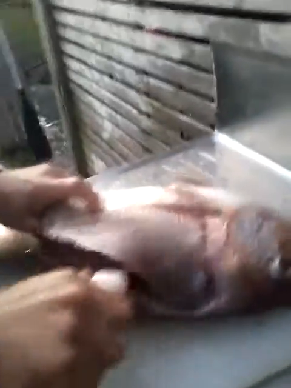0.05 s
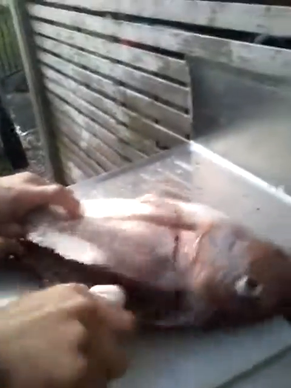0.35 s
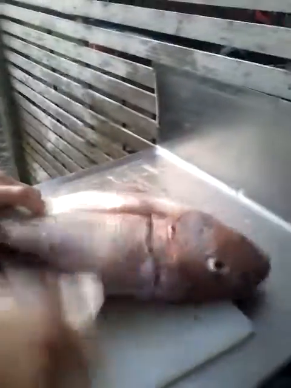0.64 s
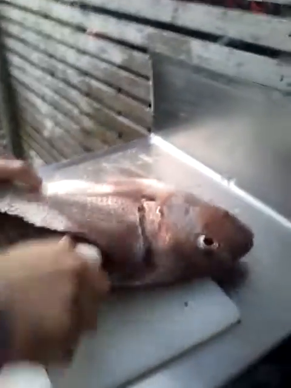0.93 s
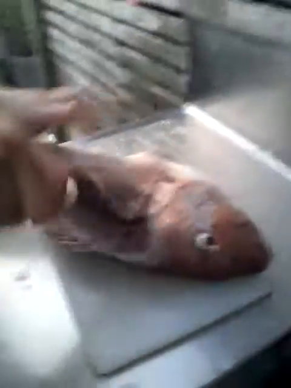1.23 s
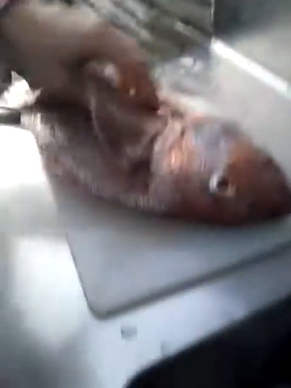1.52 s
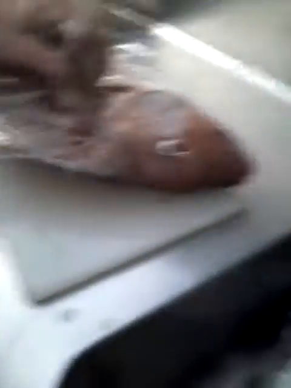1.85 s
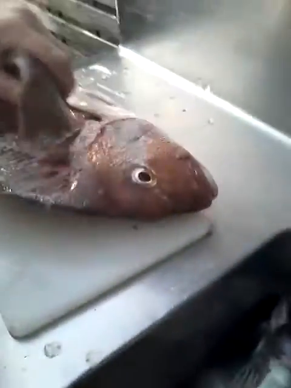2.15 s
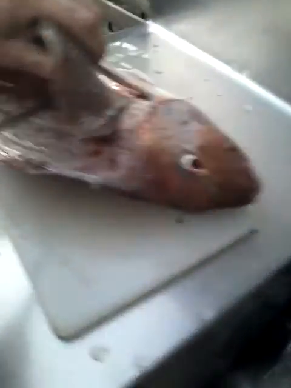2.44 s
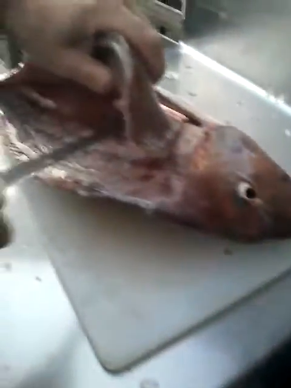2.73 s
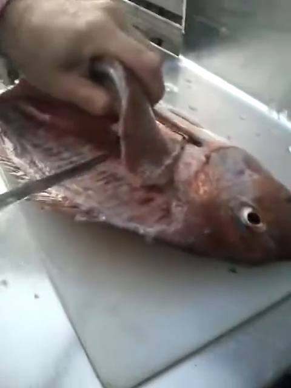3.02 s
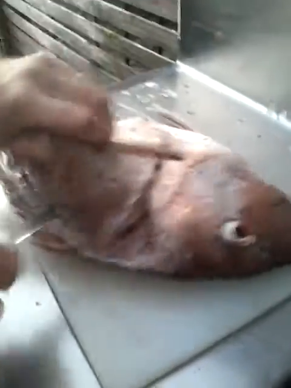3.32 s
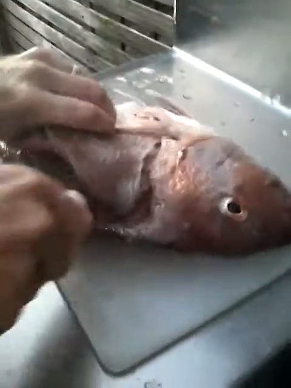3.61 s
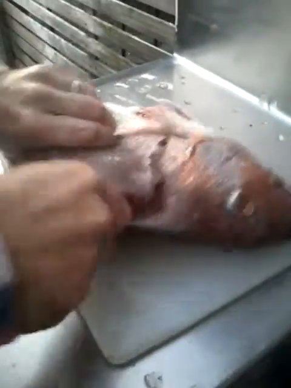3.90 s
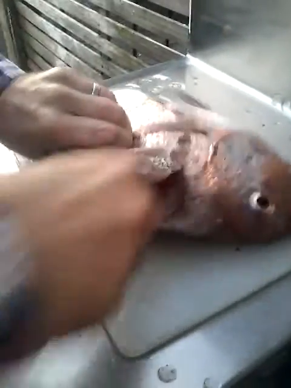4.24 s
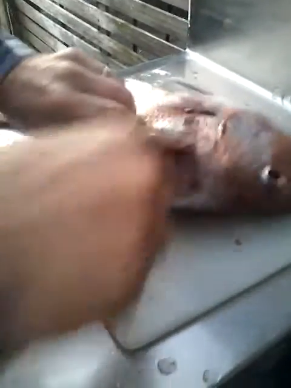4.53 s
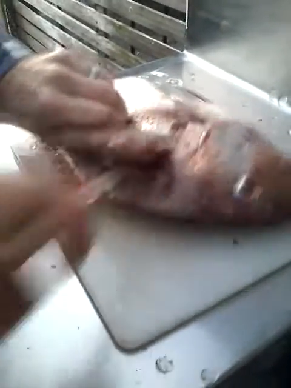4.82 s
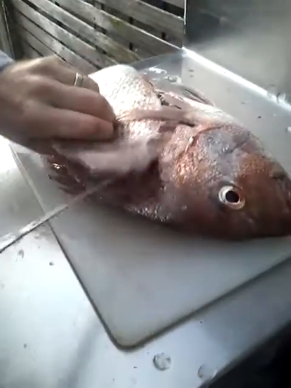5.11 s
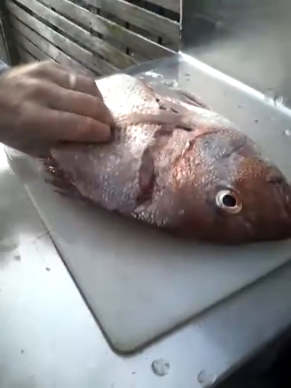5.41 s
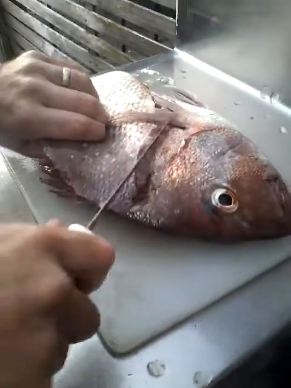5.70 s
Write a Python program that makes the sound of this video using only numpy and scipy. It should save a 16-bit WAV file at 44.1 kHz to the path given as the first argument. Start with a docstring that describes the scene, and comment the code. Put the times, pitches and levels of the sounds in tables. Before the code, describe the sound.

Close to the microphone, a blade scrapes along a fish's backbone in short strokes, crackling through little bones and wet flesh while the cutting board bumps dully. One sharp snap stands out late on, followed by a last few cuts and clicks. Nearby in the open air, a bird gives the same quiet descending whistle about twice a second, carrying on over a light hiss after the knife stops.

```python
"""On a steel outdoor bench, a knife frees a fish fillet on a plastic board.
Friction along the backbone excites the resonances of blade and bone as a rasp, and small bones
and scales fracture in sharp snaps. Wet flesh squelches and pops; the board's damped modes answer
bumps with dull knocks. Over a faint hiss, a nearby bird repeats one nearly pure whistle,
which falls about an octave and ends on a held note."""
import sys
import numpy as np
from scipy import signal
from scipy.fft import rfft, irfft, next_fast_len
from scipy.io import wavfile
from scipy.ndimage import uniform_filter1d

SR = 44100
rng = np.random.default_rng(int(sys.argv[2]) if len(sys.argv) > 2 else 0)


def inscribe(sig):
    """Save sig as 16-bit PCM at rate SR to the path in sys.argv[1].

    A 1-D sig is mono; a 2-D sig holds one channel per row.
    Samples are clipped to [-1, 1] before scaling.
    """
    pcm = np.round(np.clip(np.atleast_2d(sig).T, -1, 1) * 32767)
    wavfile.write(sys.argv[1], SR, pcm.astype(np.int16))


N = 258057

# spectra of the steady hiss and of its swells: frequency_hz, gain_db
AIR_SPECTRUM = [(20, -3), (40, -6), (60, -0.5), (241, -2), (372, -6), (417, 1), (536, -8), (587, -4),
                (1720, -9.5), (11700, -10.5), (14000, -5)]
SWELL_SPECTRUM = [(60, -7.5), (200, -1.5), (600, -1.5), (1200, -2), (3000, -8), (6300, -0.5), (9000, -7.5),
                  (14000, -14.5)]
# strokes of the knife: start_s, length_s, rasp_db, flesh_db, rub_db
STROKES = [(0.01, 0.2, -54.5, -58.5, -58.5), (0.155, 0.057, -45.5, -52, -57),
           (0.248, 0.13, -58, -62.5, -58.5), (0.394, 0.089, -57.5, -64.5, -63.5),
           (0.462, 0.22, -55, -57.5, -59), (0.679, 0.095, -51, -54, -59.5),
           (0.776, 0.035, -57.5, -56.5, -59), (0.949, 0.17, -53, -58.5, -59.5),
           (1.145, 0.155, -59, -65.5, -65.5), (1.218, 0.2, -55, -60, -60.5), (1.42, 0.09, -65.5, -67, -75),
           (1.506, 0.16, -59, -68.5, -70), (1.677, 0.095, -56, -66, -71), (1.892, 0.036, -61.5, -62, -65.5),
           (2.044, 0.49, -64, -73, -71.5), (2.511, 0.13, -57, -69.5, -67), (2.605, 0.18, -53.5, -65, -65),
           (2.743, 0.099, -57, -65.5, -65.5), (2.849, 0.14, -55.5, -63.5, -66.5),
           (2.92, 0.082, -52, -62.5, -70), (3.024, 0.19, -58.5, -67, -70),
           (3.204, 0.033, -52.5, -55.5, -61), (3.266, 0.089, -54, -62, -64),
           (3.358, 0.041, -50, -49.5, -59.5), (3.424, 0.19, -54, -62, -65),
           (3.557, 0.19, -54, -60.5, -62.5), (3.73, 0.26, -54.5, -61.5, -61.5),
           (3.875, 0.22, -52, -55, -57.5), (4.101, 0.11, -49.5, -48, -51.5),
           (4.227, 0.065, -48.5, -53.5, -49.5), (4.285, 0.2, -54, -58.5, -61.5),
           (4.402, 0.17, -48.5, -55, -58), (4.567, 0.11, -50.5, -52.5, -54),
           (4.648, 0.19, -54.5, -62, -60.5), (4.845, 0.09, -44.5, -57, -54.5),
           (5.178, 0.15, -75.5, -73, -78)]
# resonances of blade and bone: frequency_hz, width_hz, gain_db
BLADE_MODES = [(2510, 400, -21.5), (4707, 450, 0.5), (5000, 840, -2.5), (5983, 1300, 13.5), (6960, 860, 3),
               (8360, 500, -7.5), (9480, 390, -13), (10440, 700, -13), (12500, 900, -23.5)]
# spectra of the rasping edge, tearing flesh and rubbing on the board: frequency_hz, gain_db
RASP_SPECTRUM = [(1530, -37), (2600, -13), (3390, -7.5), (4040, -3), (5530, -5.5), (6130, -7), (6950, -2),
                 (8100, -2.5), (9040, -5), (13800, -9), (14600, -34.5), (15000, -41.5)]
FLESH_SPECTRUM = [(410, -26.5), (700, -4.5), (1080, -1), (1330, -1.5), (1810, -2), (2700, -3.5),
                  (4000, -4.5), (5200, -32.5), (8800, -120)]
RUB_SPECTRUM = [(22, -17), (40, -17.5), (76, -14), (115, -10.5), (165, -1.5), (270, -5), (335, -6.5),
                (483, -3), (695, -6), (792, -9), (865, -8), (1040, -6), (1120, -10), (1190, -5.5),
                (1300, -22.5), (1690, -43), (2860, -120)]
# larger bones and scales breaking: start_s, level_db, pitch_hz, relative_crunch_db, relative_crack_db
FRACTURES = [(0.0436, -22, 6640, -11, -8.5), (0.0526, -19, 7700, -8.5, -25),
             (0.0775, -15.5, 6400, -18, -32), (0.1045, -23, 4640, -13, -20),
             (0.1093, -20, 5700, -12, -13.5), (0.179, -27, 6400, -21, -12), (0.316, -21.5, 6200, -12, -19),
             (0.331, -19.5, 6520, -5, -16.5), (0.5595, -25.5, 5940, -12.5, -40),
             (0.62, -22.5, 6600, -45, -15), (0.689, -16, 6240, -11, -8), (0.7011, -28, 6450, -6, -9),
             (0.7075, -25.5, 5560, -3, -34), (0.744, -28, 6750, -8.5, -28), (0.7545, -31.5, 6300, -10, -33),
             (0.768, -29, 6450, -13, -25), (0.783, -29, 6400, -15, -27), (0.893, -39, 4320, -16, -32),
             (0.921, -43, 6370, -22, -22), (0.984, -27.5, 4030, -10, -10), (1.362, -38, 6500, -10, -24),
             (1.718, -31, 6000, -21, -17), (1.922, -45, 4400, -0.5, -26), (1.971, -38.5, 6580, -34, -26),
             (2.265, -33.5, 6840, -26, -38), (2.4034, -32, 6100, -10.5, -13), (2.543, -35, 6050, -12, -30),
             (2.594, -38.5, 6050, -4.5, -32), (2.614, -33, 5870, -15, -23), (2.627, -38, 6500, -19, -23),
             (2.645, -30, 5750, -22, -30), (2.65, -32.5, 6340, -24, -25), (2.676, -30.5, 5840, -19, -34),
             (2.704, -35, 5200, -11, -25), (2.7222, -35.5, 6700, -14, -30), (2.734, -41, 7400, -27, -4),
             (2.7611, -36, 5900, -11, -34), (2.9837, -34, 6100, -10, -30), (2.9916, -27.5, 6600, -16, -29),
             (3.1721, -33.5, 6360, -15, -38), (3.337, -45, 6500, -17, -10), (3.446, -36, 6360, -14, -12),
             (3.5242, -25, 6300, -41, -18), (3.5818, -24.5, 4930, -14, -39), (3.6167, -27, 6300, -19, -40),
             (3.6675, -33, 6100, -22, -32), (3.708, -29.5, 6300, -28, -14), (3.797, -40.5, 4700, -4, -32),
             (3.857, -36, 6700, -15, -25), (3.903, -35, 5800, -22, -22), (3.908, -28, 5400, -13, -34),
             (3.984, -29.5, 6600, -11.5, -31), (4.0196, -29.5, 4580, -26, -29.5),
             (4.0396, -27, 7320, -27.5, -6.5), (4.0444, -14.5, 7190, -40, -15),
             (4.045, -17.5, 4950, -39, -23), (4.1136, -0.5, 7280, -49, -8),
             (4.1133, -24.5, 4686, -14.5, -25), (4.181, -24.5, 5270, -16, -8), (4.189, -15, 5850, -34, -14),
             (4.2459, -25, 7700, -16, -1.5), (4.273, -30.5, 7300, -29, -4.5),
             (4.2907, -27.5, 5670, -24, -25), (4.411, -34.5, 5060, -27, -17),
             (4.447, -26.5, 4730, -18, -35), (4.47, -25.5, 4600, -13, -38), (4.554, -44, 7000, -30, 0),
             (4.6553, -25.5, 8740, -11, -10), (4.676, -33, 5200, -16, -28), (4.717, -33.5, 6800, -16, -11),
             (4.7338, -34, 7040, -18, -11), (4.762, -44, 7200, -38, -2), (4.8773, -17.5, 4300, -16, -14.5),
             (4.8815, -22.5, 7100, -13, -22), (4.92, -32.5, 5470, -3, -30), (4.938, -26, 7800, -26, -21),
             (5.329, -50, 6110, -17, -7), (5.7234, -37, 6030, -17.5, -22)]
# fish and knife hand bumping the board: start_s, level_db, pitch_hz, relative_thud_db
KNOCKS = [(0.051, -46.5, 437, -32), (0.108, -48, 450, -28), (0.33, -39, 467, -43), (0.6885, -45, 471, -30),
          (0.705, -41.5, 370, -14), (0.716, -37, 334, -23), (0.755, -46, 230, -21), (0.894, -58, 380, -14),
          (0.98, -51, 220, -18), (1.896, -53, 910, -25), (1.916, -56, 630, -29), (3.523, -49, 600, -22),
          (4.026, -46, 230, -12), (4.113, -27.5, 600, -26), (4.115, -32.5, 561, -24.5),
          (4.122, -41.5, 176, -12.5), (4.268, -41.5, 555, -9), (4.278, -44.5, 165, 0),
          (4.646, -45, 166, -27), (4.869, -37.5, 1015, -30), (4.871, -37.5, 690, -29),
          (4.878, -39, 215, -27), (4.904, -54, 757, -14)]
# resonances of the board under the fish: frequency_hz, width_hz, gain_db
BOARD_MODES = [(176, 290, -5), (234, 70, -3.5), (361, 87, -2), (440, 44, 2.5), (592, 45, -2.5),
               (740, 200, -12)]
# the bird's calls: start_s, top_pitch_hz, fall_s, fall_db, held_db, held_s
WHISTLES = [(0.49, 2350, 0.034, -60, -59, 0.081), (1.009, 2280, 0.033, -58.5, -57.5, 0.072),
            (1.616, 2250, 0.036, -59, -65, 0.067), (2.233, 2430, 0.032, -57, -61, 0.064),
            (2.781, 2520, 0.031, -54.5, -58, 0.073), (3.347, 2520, 0.027, -53, -59.5, 0.073),
            (3.913, 2350, 0.028, -56.5, -57.5, 0.078), (4.525, 2480, 0.034, -54.5, -56.5, 0.083),
            (5.173, 2400, 0.035, -64.5, -65.5, 0.053), (5.766, 2450, 0.033, -64, -65, 0.055)]
# contour of the hollow hum: time_s, level_db
HUM_CONTOUR = [(1.15, -91), (1.27, -67), (1.42, -63), (1.53, -76.5), (1.7, -76), (1.83, -97), (1.95, -77.5),
               (2.4, -77), (2.7, -82)]
# pockets of wet flesh popping open: start_s, level_db, pitch_hz
WET_POPS = [(1.2735, -40.5, 5800), (1.2945, -45, 5660), (1.2975, -35.5, 8850), (1.2995, -34, 5710),
            (1.3012, -31.5, 5640), (2.5247, -44, 6160), (3.168, -41, 6360), (3.667, -33, 6110),
            (4.9255, -35, 7060), (4.946, -37, 7900)]

LIFTED_S = 5.0  # the blade stops resting in the fish


def from_db(db):
    """Amplitude ratio of a level in decibels."""
    return 10 ** (np.asarray(db) / 20)


def rms_one(x):
    """Normalisation to unit rms."""
    return x / np.sqrt(np.mean(x ** 2) + 1e-20)


def crest_one(x, size):
    """Normalisation to unit rms over the loudest run of `size` samples."""
    return x / np.sqrt(uniform_filter1d(x ** 2, size).max())


def add(out, start_s, sound):
    """Superposition of a sound from a given time on."""
    start = max(0, round(start_s * SR))
    out[start:start + len(sound)] += sound[:N - start]


def band(x, low_hz, high_hz, order=2):
    """Causal band-pass filtering."""
    sections = signal.butter(order, [low_hz, min(high_hz, .45 * SR)], "band", fs=SR, output="sos")
    return signal.sosfilt(sections, x)


def resonance(x, hz, width_hz):
    """Forced response of a damped two-pole oscillator, with unit peak gain."""
    r = np.exp(-np.pi * width_hz / SR)
    feedback = [1, -2 * r * np.cos(2 * np.pi * hz / SR), r * r]
    return signal.lfilter(np.array([1, 0, -1]) * (1 - r * r) / 2, feedback, x)


def wandering_resonance(x, hz, width_hz):
    """Forced response of an oscillator whose natural frequency varies sample by sample."""
    r = np.exp(-np.pi * width_hz / SR)
    turn = np.exp(2j * np.pi * np.cumsum(hz) / SR)
    return 2 * np.real(turn * signal.lfilter([1 - r], [1, -r], x / turn))


def coloured(x, spectrum):
    """Spectral shaping by a gain curve, normalised to unit rms."""
    hz, db = np.transpose(spectrum)
    size = next_fast_len(N + SR // 10)
    bin_hz = np.maximum(np.arange(size // 2 + 1) * SR / size, 1)
    gain = from_db(np.interp(np.log(bin_hz), np.log(hz), db, left=-90, right=-90))
    return rms_one(irfft(rfft(x, size) * gain, size)[:N])


def drift(per_s):
    """Random modulation of unit rms, interpolated between independent values."""
    knots = rng.standard_normal(int(per_s * N / SR) + 2)
    return rms_one(np.interp(np.arange(N) * per_s / SR, np.arange(len(knots)), knots))


def envelope(t, attack_s, length_s, release_s):
    """Linear rise from t = 0, then exponential decay after length_s."""
    return np.clip(t / attack_s, 0, 1) * np.exp(-np.clip((t - length_s) / release_s, 0, 20))


def friction(per_s, spread_db, grain_s, smooth_db):
    """Shot noise: tiny tears of uneven size, each a decaying puff, over smooth sliding."""
    sizes = from_db(spread_db * np.minimum(rng.exponential(1, N), 3.5))
    tears = (rng.random(N) < per_s / SR) * sizes ** 2
    power = signal.lfilter([1], [1, -np.exp(-1 / (grain_s * SR))], tears + 1e-18)
    return rng.standard_normal(N) * np.sqrt(power / power.mean() + from_db(smooth_db) ** 2)


def burst(t60_s, rise_s):
    """A transient force of random sign and exponential decay, as of fibres failing in a fast run."""
    t = np.arange(SR // 14) / SR
    return rng.choice([-1, 1], len(t)) * from_db(-60 * t / t60_s) * (1 - np.exp(-t / rise_s))


def hiss(steady_db=-74.5, swell_db=-69, lead_s=0.022):
    """Broadband noise: a faint steady floor, and an amplitude swell around each whistle."""
    t = np.arange(N) / SR
    swell = sum(envelope(t - start_s + lead_s, attack_s=0.014, length_s=0.064, release_s=0.056)
                for start_s, *_ in WHISTLES)
    steady = from_db(steady_db) * coloured(rng.standard_normal(N), AIR_SPECTRUM)
    return steady + from_db(swell_db) * swell * coloured(rng.standard_normal(N), SWELL_SPECTRUM)


def stroke_levels(resting_db=(-69, -73.5, -73), attack_s=0.03, release_s=0.03):
    """Amplitude envelopes, in dB, of rasp, flesh and rubbing: each stroke bites, holds and lets go."""
    t = np.arange(N) / SR
    in_fish = 1 - np.clip((t - LIFTED_S) / release_s, 0, 1)
    level = np.outer(from_db(resting_db), in_fish)
    for start_s, length_s, *levels_db in STROKES:
        push = envelope(t - start_s, attack_s, length_s, release_s)
        level = np.maximum(level, np.outer(from_db(levels_db), push))
    return 20 * np.log10(level + 1e-9)


def blade_rasp():
    """Friction over the ribs drives the blade's modes, which shift and swell as it moves in the flesh."""
    teeth = friction(per_s=63, spread_db=4.5, grain_s=0.0024, smooth_db=4.0)
    ringing = np.zeros(N)
    for hz, width_hz, db in BLADE_MODES:
        gain = from_db(db + 4.0 + 4.0 * drift(7))
        ringing += gain * wandering_resonance(teeth, hz * (1 + .03 * drift(5)), .6 * width_hz)
    rasp = coloured(teeth + ringing, RASP_SPECTRUM)
    return rasp / np.sqrt(uniform_filter1d(rasp ** 2, size=SR // 16))  # evens out the loudness


def flesh_tearing():
    """Dense, uneven ruptures of wet tissue sum to a squelching noise."""
    return coloured(friction(per_s=160, spread_db=9.0, grain_s=0.0014, smooth_db=5.0), FLESH_SPECTRUM)


def board_rubbing():
    """Sliding friction of fish on board, given a hollow note by a resonance of the bench."""
    sliding = friction(per_s=120, spread_db=1.5, grain_s=0.0011, smooth_db=6.0)
    hollow = from_db(-4) * resonance(sliding, hz=480, width_hz=80)
    return coloured(sliding + hollow, RUB_SPECTRUM)


def cutting(rasp_db, flesh_db, rub_db):
    """Common amplitude modulation: edge, flesh and sliding fish all catch together."""
    catching = drift(70)
    rasp = blade_rasp() * from_db(rasp_db - 1.24 + 1.86 * catching)
    flesh = flesh_tearing() * from_db(flesh_db - 1.0 + 0.86 * catching)
    rub = board_rubbing() * from_db(rub_db - 3.0 + 1.5 * catching)
    return rasp + flesh + rub


def crackles(rasp_db, per_s=80, above_db=10.5, spread_db=5.5, centre_hz=6145, spread_octaves=0.3):
    """A random point process of tiny pops under the blade, in proportion to the stroke's strength."""
    rows = []
    for when, size, pitch in rng.random((int(per_s * LIFTED_S), 3)):
        start_s = when * LIFTED_S
        level_db = rasp_db[int(start_s * SR)] + above_db + spread_db * (2 * size - 1)
        octaves = np.clip(spread_octaves * np.arctanh(2 * pitch - 1), -2, 1)
        rows.append((start_s, level_db, centre_hz * 2 ** octaves))
    return pops(rows, cycles=9, rise_s=0.00003)


def first_gives(lead_s=0.0046):
    """Yield before fracture: tough tissue gives weakly ahead of each snap; rows as in FRACTURES."""
    return [(start_s - lead_s, level_db + crunch_db - 1.5, hz, crunch_db, crack_db)
            for start_s, level_db, hz, crunch_db, crack_db in FRACTURES]


def snaps(fractures, favour_db=11.5, favour_octaves=0.085):
    """Fracture excites the blade's modes, most near its own pitch, with a crack above and crunch below."""
    out = np.zeros(N)
    for start_s, level_db, hz, crunch_db, crack_db in fractures:
        t60_s = 0.031 * 2 ** (crunch_db / 32)  # a break through flesh outlasts a clean one
        force = burst(t60_s, rise_s=0.0001)
        force[0] = 5  # the first fibre parts with a clean click
        ring = from_db(19.0) * rms_one(resonance(force, hz, width_hz=370))
        for mode_hz, width_hz, db in BLADE_MODES:
            nearness = np.exp(-(np.log2(mode_hz / hz) / favour_octaves) ** 2)
            ring += from_db(db + favour_db * nearness) * rms_one(resonance(force, mode_hz, width_hz))
        ring = crest_one(band(ring, 1200, 10000), size=66)
        crack = crest_one(band(burst(0.79 * t60_s, rise_s=0.00012), 5500, 11800, order=3), size=66)
        crunch = crest_one(band(burst(1.04 * t60_s, rise_s=0.00036), 840, 3200), size=66)
        snap = from_db(-9.5) * ring + from_db(crack_db - 7.5) * crack + from_db(crunch_db - 10) * crunch
        add(out, start_s, from_db(level_db) * snap)
    return out


def knocks(scuff_db=-9, spot_db=3):
    """A soft impact excites the struck spot and the board's damped modes; the bench thuds below."""
    out = np.zeros(N)
    for start_s, level_db, hz, thud_db in KNOCKS:
        scuff = burst(t60_s=0.053, rise_s=0.001)
        force = signal.unit_impulse(len(scuff)) + from_db(scuff_db) * scuff / np.linalg.norm(scuff)
        push = resonance(force, hz, width_hz=400)
        spot = from_db(spot_db) * resonance(push, hz, width_hz=120)
        modes = sum(from_db(db) * resonance(push, mode_hz, width) for mode_hz, width, db in BOARD_MODES)
        ring = crest_one(spot + modes, size=180)
        thud = crest_one(band(burst(t60_s=0.024, rise_s=0.00051), 87.6, 220), size=440)
        add(out, start_s, from_db(level_db - 1.5) * ring + from_db(level_db + thud_db - 6) * thud)
    return out


def bird(last_hz=1127, sag_hz_per_s=130, waver=0.0091, overtone_db=-26):
    """Frequency modulation of a nearly pure tone: a fluttering glide down to an almost level note."""
    out = np.zeros(N)
    t = np.arange(SR // 3) / SR
    held_hz = last_hz - sag_hz_per_s * t
    fall = envelope(t, attack_s=0.0085, length_s=0.03, release_s=0.017)
    for start_s, top_hz, fall_s, fall_db, held_db, held_s in WHISTLES:
        glide_hz = held_hz + (top_hz - held_hz) * np.exp(-(t / fall_s) ** 1.95)
        pitch_hz = glide_hz * (1 + waver * drift(300)[:len(t)])
        phase = 2 * np.pi * np.cumsum(pitch_hz) / SR
        tone = np.sin(phase) + from_db(overtone_db) * np.sin(2 * phase)
        held = envelope(t - 0.051, attack_s=0.0079, length_s=held_s, release_s=0.011)
        level = fall * from_db(fall_db + 5.0 * drift(260)[:len(t)])
        level += held * from_db(held_db + 3.0 * drift(53)[:len(t)])
        add(out, start_s, np.sqrt(2) * level * tone)
    return out


def hum(hz=500, width_hz=240):
    """Narrow-band noise, faint and hollow, while the fillet is pulled up and held."""
    noise = resonance(resonance(rng.standard_normal(N), hz, width_hz), hz, width_hz)
    level_db = np.interp(np.arange(N) / SR, *np.transpose(HUM_CONTOUR), left=-120, right=-120)
    return from_db(level_db) * rms_one(noise)


def pops(rows, cycles, rise_s):
    """Damped free oscillation: each wet pop rings down by 60 dB in the given number of cycles."""
    out = np.zeros(N)
    t = np.arange(SR // 50) / SR
    for start_s, level_db, hz in rows:
        ring = np.sin(2 * np.pi * hz * t) * (1 - np.exp(-t / rise_s)) * from_db(-60 * t * hz / cycles)
        add(out, start_s, from_db(level_db) * ring / np.abs(ring).max())
    return out


def echoes(x, t60_s, delay_s):
    """Diffuse reflection: convolution with delayed, decaying noise of unit energy."""
    t = np.arange(SR // 2) / SR
    response = rng.standard_normal(len(t)) * from_db(-60 * t / t60_s) * (t > delay_s)
    response = band(response, 95, 7100, order=1)
    return signal.fftconvolve(x, response / np.linalg.norm(response))[:N]


def scene():
    """Direct sound plus reflections: bench and fence answer the knife, and the yard adds a faint tail."""
    rasp_db, flesh_db, rub_db = stroke_levels()
    background = hiss() + hum()
    whistle = bird()
    knife = cutting(rasp_db, flesh_db, rub_db) + knocks() + snaps(FRACTURES + first_gives())
    knife += pops(WET_POPS, cycles=64, rise_s=0.00036) + crackles(rasp_db)
    bench_and_fence = from_db(-16) * echoes(knife, t60_s=0.085, delay_s=0.0027)
    knife_tail = from_db(-22) * echoes(knife, t60_s=0.15, delay_s=0.0098)
    # the yard scatters the top of the bird's call
    scattered = from_db(-9) * echoes(band(whistle, 1300, 4000), t60_s=0.13, delay_s=0.0056)
    whistle_tail = from_db(-15) * echoes(whistle, t60_s=0.35, delay_s=0.016)
    return (knife + bench_and_fence + knife_tail + whistle + scattered + whistle_tail + background)[None]


def record(dry, cutoff_hz=14700):
    """Elliptic low-pass filtering cuts the highest treble steeply."""
    return signal.sosfilt(signal.ellip(10, .1, 70, cutoff_hz, fs=SR, output="sos"), dry)


dry = scene()
out = record(dry)
inscribe(out)
```